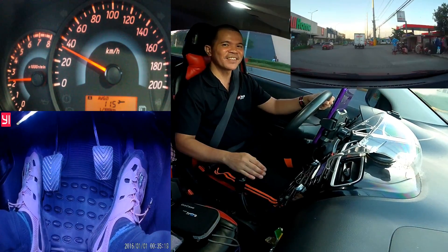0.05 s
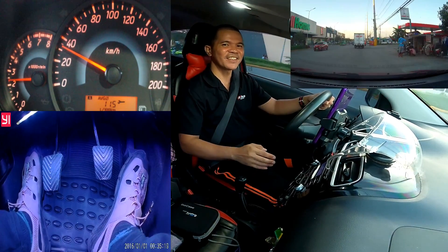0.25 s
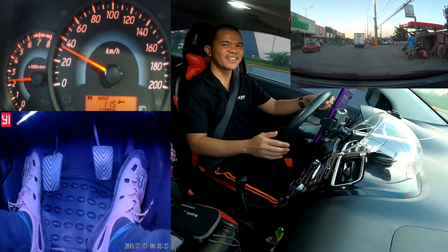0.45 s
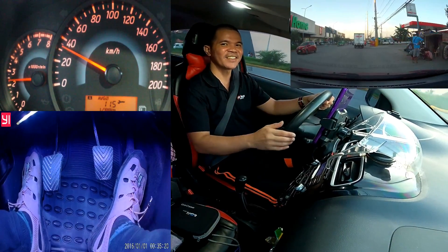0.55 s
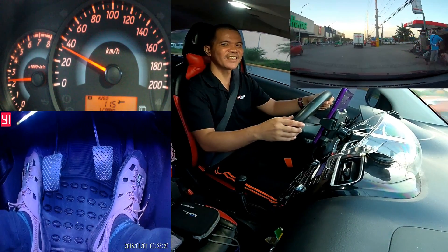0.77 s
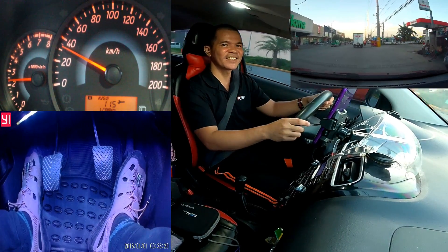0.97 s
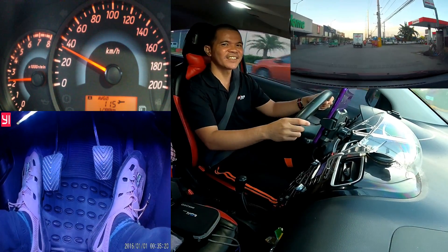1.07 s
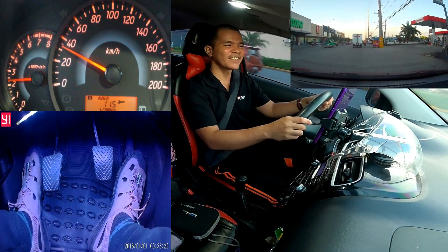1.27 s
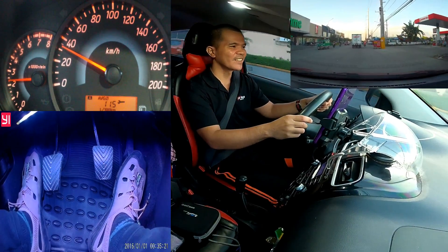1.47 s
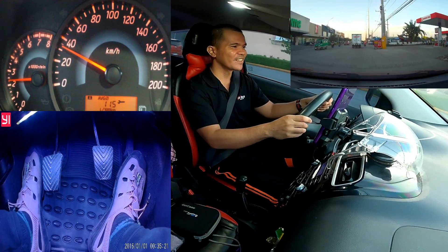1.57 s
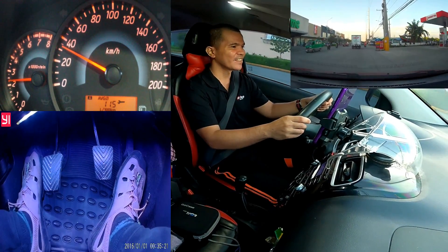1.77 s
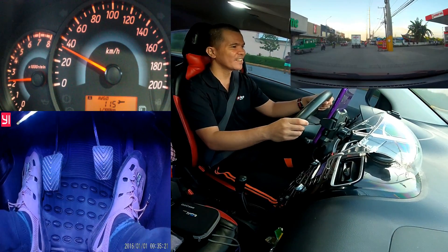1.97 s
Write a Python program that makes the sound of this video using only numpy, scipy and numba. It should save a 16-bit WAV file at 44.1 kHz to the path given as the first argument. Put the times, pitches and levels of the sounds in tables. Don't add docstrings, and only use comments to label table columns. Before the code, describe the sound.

Deep, steady car interior rumble, engine drone and road noise booming in a slowly rolling cabin

```python
import sys
import numpy as np
from scipy import signal
from scipy.fft import rfft, irfft
from scipy.io import wavfile
from scipy.ndimage import uniform_filter1d
from numba import njit

SR = 44100
rng = np.random.default_rng(int(sys.argv[2]) if len(sys.argv) > 2 else 0)


def wav_record(signal):
    frames = np.transpose(np.atleast_2d(signal))
    bounded = np.clip(frames, -1, 1)
    quanta = np.round(bounded * 32767).astype(np.int16)
    wavfile.write(sys.argv[1], SR, quanta)


def linear_from_db(decibels):
    return 10 ** (np.asarray(decibels, float) / 20)


N = 89214

# [t/s, peak/dB]
DIPS = [
    (-.004, -7),
    (2.024, -3.5),
]
# [t/s, firing rate f/Hz, level/dB]
FIRING = [(0.0, 34.27, -10), (0.3, 34.33, -17.5), (0.34, 33.98, -39.5), (0.46, 35.66, -15),
          (0.52, 35.69, -35.5), (0.66, 35.72, -17), (0.98, 33.89, -18.5), (1.06, 31.1, -27),
          (1.14, 31.81, -16), (1.3, 33.52, -18), (1.32, 32.99, -30.5), (1.48, 32.96, -12),
          (1.62, 35.67, -30), (1.69, 35.68, -17.5), (1.79, 33.74, -13.5), (1.84, 32.96, -14),
          (1.95, 37.63, -38), (2.02, 39.05, -8)]
# [f/Hz, width/Hz, level/dB]
BOOM_MODES = [(34.17, 13, 2), (57.3, 9.9, -1.5), (91.1, 26, -1), (118.8, 13, -8), (159.2, 66, -3.5),
              (247.4, 11, -18.5)]
# [t/s, f/Hz, level/dB]
CABIN_AIR = [(0.0, 57.3, -3), (0.02, 52.6, -24), (0.15, 55.8, -12.5), (0.16, 56.7, -24.5),
             (0.31, 60.8, -11), (0.33, 60.2, -22), (0.55, 55.35, -15), (0.58, 53.4, -29),
             (0.61, 54.23, -17), (0.94, 54.8, -19), (1.17, 52, -17.5), (1.18, 53.8, -16),
             (1.31, 53.63, -14.5), (1.38, 56.7, -11), (1.4, 56.28, -19.5), (1.65, 56.63, -22.5),
             (1.91, 54.7, -14), (2.02, 45, -14.5)]
# [t/s, f/Hz, level/dB]
FLOOR_PAN = [(0.0, 87.06, -18), (0.15, 73.3, -19), (0.25, 87.46, -16), (0.31, 81.6, -14),
             (0.39, 94.2, -20.5), (0.46, 93.8, -22.5), (0.51, 82.22, -25.5), (0.65, 85.92, -20.5),
             (0.74, 77.2, -24.5), (0.81, 85.56, -27.5), (0.91, 76.2, -19), (1.22, 88.11, -21.5),
             (1.27, 97.97, -22), (1.51, 88.57, -19), (1.75, 92.44, -22.5), (1.81, 77.9, -16.5),
             (1.88, 75.1, -19.5), (2.02, 87.5, -18.5)]
# [f/Hz, density/dB per Hz]
RUMBLE_SPECTRUM = [(9, -25), (30, -4), (46, -5), (65, -4.5), (236, -15.5), (350, -23.5), (500, -33),
                   (900, -70.5)]
# [t/s, level/dB]
ROUGHNESS = [
    (0.1, -27),
    (0.804, -26.5),
    (1.644, -26),
    (1.666, -23.5),
    (1.83, -30),
    (1.95, -27),
]
# [f/Hz, density/dB per Hz]
ROAR_SPECTRUM = [(240, -30), (400, -7), (594, -0.5), (686, -6.5), (1120, -6), (1850, -19.5), (7000, -40),
                 (16000, -39)]
# [f/Hz, width/Hz, lift/dB]
PANELS = [(218.4, 49, 2), (350, 40, 5.5), (497, 40, 6.5), (663, 27, -1.5), (750, 18, 2.5), (877, 90, 4),
          (1124, 12, 7), (1379, 11, 7.5), (2050, 82, 3), (2800, 80, 3), (3254, 42, 8), (4870, 2500, 2.5)]
# [t/s, peak/dB, ring f/Hz, width/share of f]
TICKS = [(.075, -51, 10500, .4), (.401, -51, 10500, .3), (.405, -48, 4600, .2), (.406, -53, 7300, .04),
         (.4565, -45, 2600, .3), (.4565, -42, 3600, .15), (.4565, -43, 4900, .2), (.457, -49, 6500, .25),
         (.457, -46, 10500, .3), (.457, -42, 14000, .3), (.6873, -49, 2600, .2), (.8415, -42, 2950, .04),
         (.842, -53, 7300, .05), (.842, -55, 6500, .05), (.848, -51, 4500, .15), (.862, -50, 11000, .3),
         (.862, -45, 14300, .15), (1.295, -48, 2700, .2), (1.29, -44, 14000, .3), (1.305, -45, 13500, .3)]
# [f/Hz, level/dB]
PORT_LEVEL = [(60, -.6), (110, -.55), (200, 0), (380, .6), (700, 2), (1290, 2.4), (2380, 1.3), (4400, 0),
              (8120, 2)]
# [f/Hz, phase/rad]
PORT_PHASE = [(300, 0), (700, -0.58), (1380, -0.94), (1800, -.4), (3400, -0.6), (5000, 0.83), (9000, 0.28)]
# [f/Hz, level/dB re common sound]
DIFFUSE = [(40, -29.5), (200, -24.5), (400, -14.5), (800, -29.5), (1500, -3), (4000, -8.5), (12000, -6.5)]
# [f/Hz, level/dB]
MIC_COLOUR = [(7000, 0), (7300, -1), (8400, -10), (9800, -7.5), (10500, -17), (12600, -23), (13100, -29),
              (15600, -36)]

LEAD = 4096
M = N + 2 * LEAD
T_S = (np.arange(M) - LEAD) / SR
HZ = np.maximum(np.fft.rfftfreq(M, 1 / SR), 1)

DIP_HZ, DIP_S = 31, 0.005
JITTER_FIRINGS, SCATTER_DB, MUFFLE_HZ, ENGINE_DB = .07, 3.5, 397, -23
WAVER_SHARE, WAVER_RATE_HZ = .012, 8.04
ROAD_DB, ROAR_DB = 12, -35.5
TICK_T60_S, TICK_RISE_S = .036, .0004
CEILING_DB, RATIO, ATTACK_S, RELEASE_S = -5.5, 7, 0.00051, 0.019


def level(x, db):
    return x * linear_from_db(db) / np.sqrt(np.mean(x ** 2))


def curve(table, column):
    rows = np.array(table)
    return np.interp(T_S, rows[:, 0], rows[:, column])


def shape(table):
    rows = np.array(table)
    return np.interp(np.log(HZ), np.log(rows[:, 0]), rows[:, 1])


def ring(hz, width_hz):
    return 1 / (1 + 1j * (HZ / hz - hz / HZ) * hz / width_hz)


def walk(rate_hz):
    hold = int(SR / rate_hz)
    steps = rng.standard_normal(M // 100 + 1)[:M // hold + 1]
    slewed = uniform_filter1d(np.repeat(steps, hold), hold)
    return 1.3 * uniform_filter1d(slewed, hold)[:M]


def breathing_noise(gain, lo_hz, hi_hz, swell_db, flicker_db, flicker_hz):
    spectrum = rfft(rng.standard_normal(M)) * gain
    swell = walk(3.5)
    band_position = 2 * np.log2(HZ / lo_hz)
    out = np.zeros(M)
    for k in range(int(2 * np.log2(hi_hz / lo_hz)) + 2):
        band = irfft(spectrum * np.clip(1 - abs(band_position - k), 0, 1), M)
        out += band * linear_from_db(swell_db * swell + flicker_db * walk(flicker_hz))
    return out


def dips():
    out = np.zeros(M)
    for s, db in DIPS:
        age_s = T_S - s
        out -= linear_from_db(db) * np.cos(2 * np.pi * DIP_HZ * age_s) * np.exp(-.5 * (age_s / DIP_S) ** 2)
    return out


def engine():
    firings = np.cumsum(curve(FIRING, 1)) / SR
    chance = rng.standard_normal((200, 2))
    at = np.searchsorted(firings, np.arange(200) + JITTER_FIRINGS * chance[:, 0])
    pulses = np.zeros(M + 1)
    pulses[at] = linear_from_db(SCATTER_DB * chance[:, 1])
    body = sum((-1) ** k * linear_from_db(db) * ring(f, w) ** 2 for k, (f, w, db) in enumerate(BOOM_MODES))
    muffle = 1 / (1 + 1j * HZ / MUFFLE_HZ) ** 2
    return level(irfft(rfft(pulses[:M]) * body * muffle, M), ENGINE_DB)


def drone():
    out = np.zeros(M)
    for tone in (FIRING, CABIN_AIR, FLOOR_PAN):
        pitch_hz = curve(tone, 1) * (1 + WAVER_SHARE * walk(WAVER_RATE_HZ))
        wave = np.sin(2 * np.pi * np.cumsum(pitch_hz) / SR)
        out += np.sqrt(2) * linear_from_db(curve(tone, 2)) * wave
    return out


def road():
    lift = 1 + sum(0.68 * abs(ring(f, w)) ** 2 for f, w, _ in BOOM_MODES + PANELS[:2])
    rumble = breathing_noise(linear_from_db(shape(RUMBLE_SPECTRUM)) * lift, 8.5, 700,
                             swell_db=.2, flicker_db=.97, flicker_hz=4.6)
    return level(rumble, ROAD_DB) * linear_from_db(curve(ROUGHNESS, 1))


def roar():
    lift_db = sum(db * abs(ring(f, w)) ** 2 for f, w, db in PANELS)
    hiss = breathing_noise(linear_from_db(shape(ROAR_SPECTRUM) + lift_db), 524, 16000,
                           swell_db=.3, flicker_db=.8, flicker_hz=22)
    return level(hiss, ROAR_DB)


def ticks():
    out = np.zeros(M)
    for s, db, hz, share in TICKS:
        age_s = np.clip(T_S - s, 0, 1)
        envelope = (1 - np.exp(-age_s / TICK_RISE_S)) * 1000. ** (-age_s / TICK_T60_S)
        grit = rng.standard_normal(M) * envelope
        tick = irfft(rfft(grit) * ring(hz, share * hz) ** 2, M)
        out += linear_from_db(db) * tick / np.abs(tick).max()
    return out


def scene():
    common = rfft(dips() + engine() + drone() + road() + roar() + ticks()) * linear_from_db(shape(MIC_COLOUR))
    unrelated = rfft(road() + roar()) * linear_from_db(shape(DIFFUSE) + shape(MIC_COLOUR))
    port = linear_from_db(shape(PORT_LEVEL) / 2) * np.exp(.5j * shape(PORT_PHASE))
    left = irfft((common + unrelated) * port, M)
    right = irfft((common - unrelated) / port, M)
    return np.array([left, right])[:, LEAD:LEAD + N]


@njit
def follow(x, attack, release):
    e, out = .2, np.empty(len(x))
    for i in range(len(x)):
        e += (x[i] - e) * (attack if x[i] > e else release)
        out[i] = e
    return out


def limiter(x):
    envelope = follow(np.abs(x).max(axis=0), 1 / (ATTACK_S * SR), 1 / (RELEASE_S * SR))
    gain = np.minimum(linear_from_db(CEILING_DB) / envelope, 1) ** (1 - 1 / RATIO)
    return x * uniform_filter1d(gain, size=128)


def low_pass(x):
    return signal.sosfilt(signal.butter(12, 15710, fs=SR, output="sos"), x)


def record(dry):
    mix = limiter(dry)
    return low_pass(mix)


dry = scene()
out = record(dry)
wav_record(out)
```